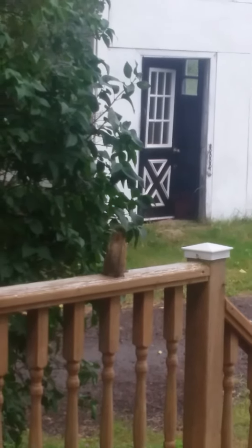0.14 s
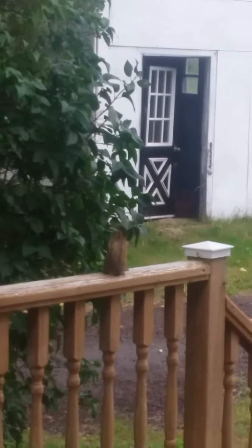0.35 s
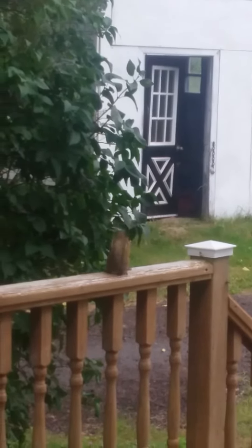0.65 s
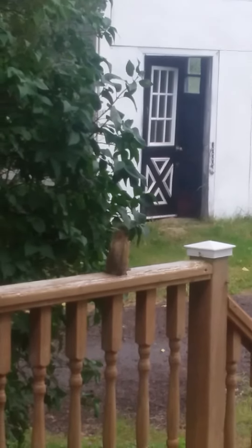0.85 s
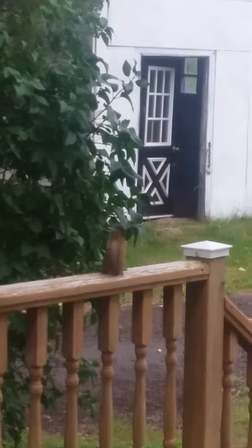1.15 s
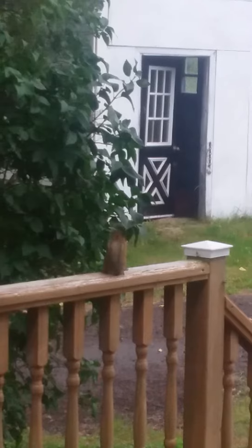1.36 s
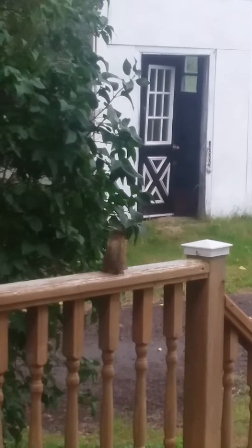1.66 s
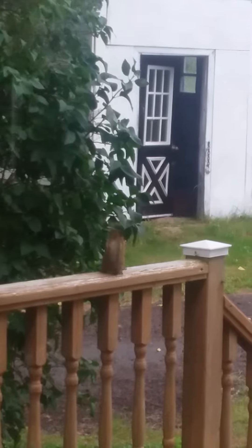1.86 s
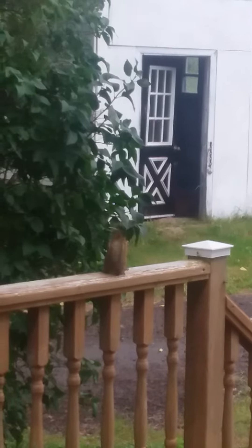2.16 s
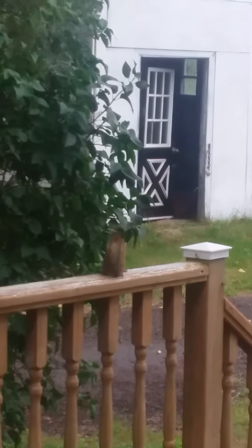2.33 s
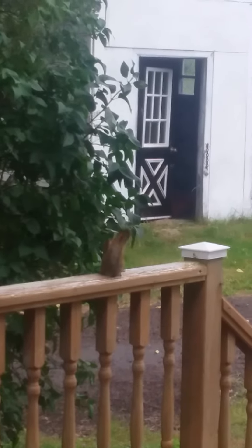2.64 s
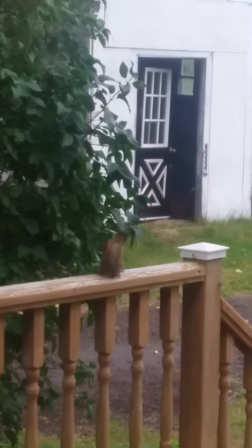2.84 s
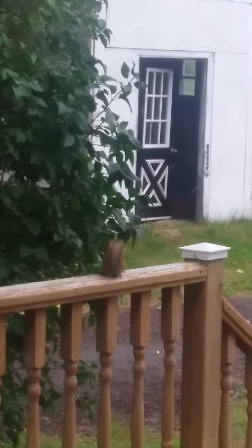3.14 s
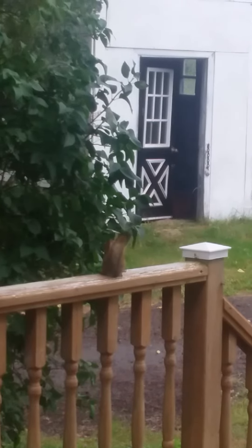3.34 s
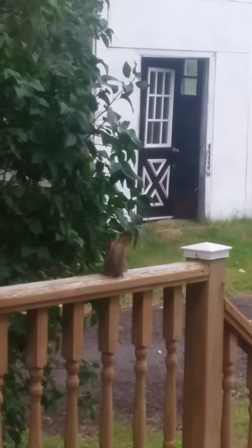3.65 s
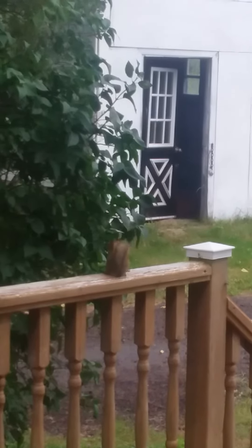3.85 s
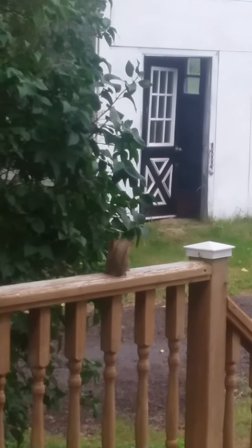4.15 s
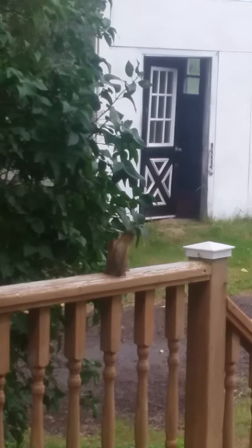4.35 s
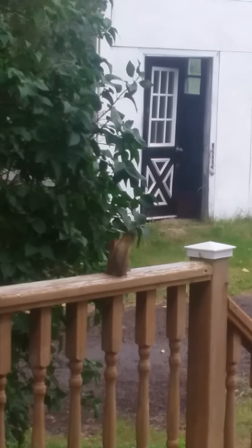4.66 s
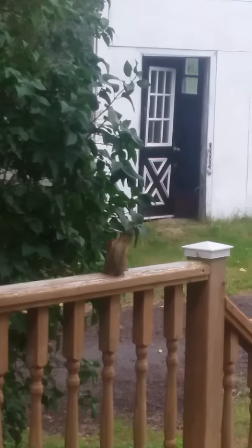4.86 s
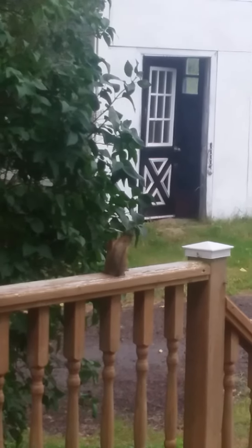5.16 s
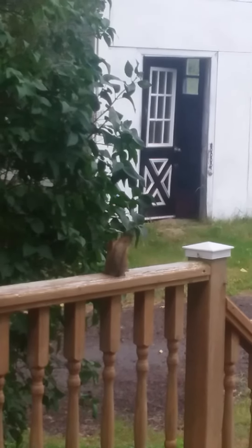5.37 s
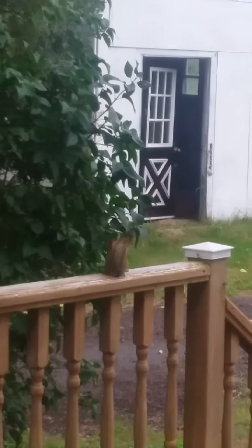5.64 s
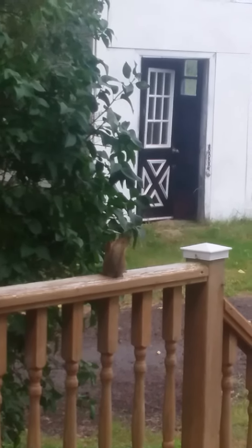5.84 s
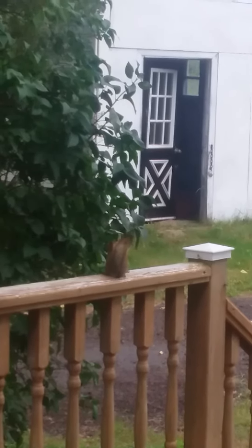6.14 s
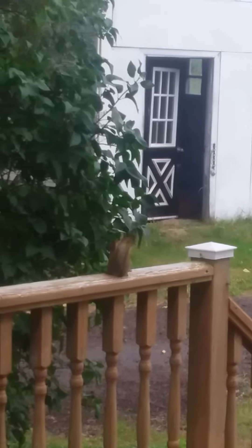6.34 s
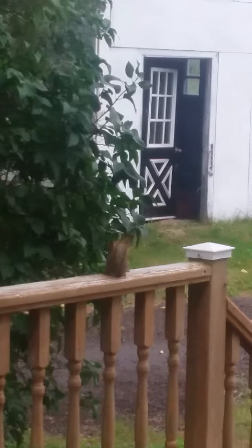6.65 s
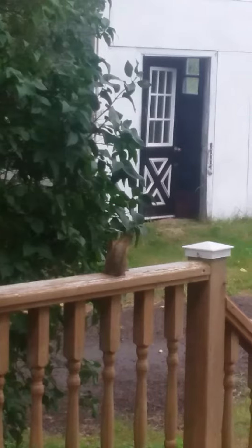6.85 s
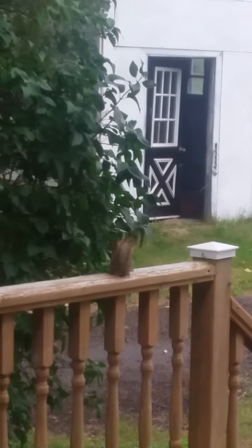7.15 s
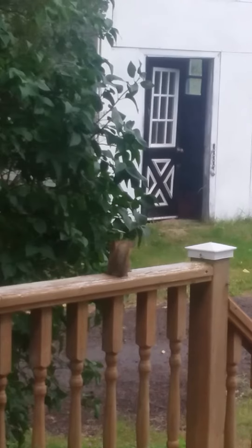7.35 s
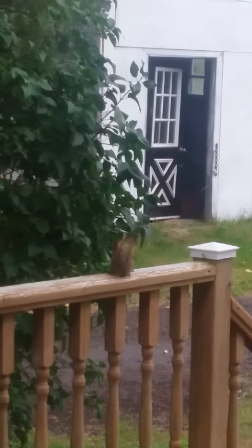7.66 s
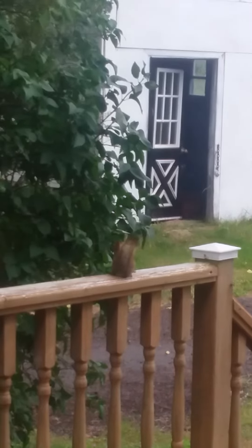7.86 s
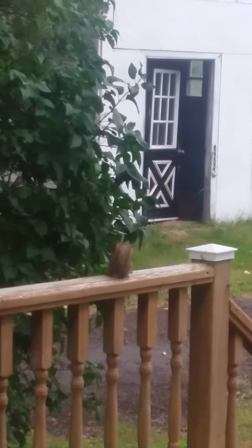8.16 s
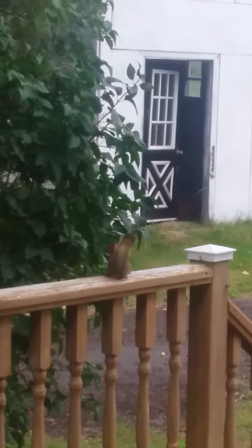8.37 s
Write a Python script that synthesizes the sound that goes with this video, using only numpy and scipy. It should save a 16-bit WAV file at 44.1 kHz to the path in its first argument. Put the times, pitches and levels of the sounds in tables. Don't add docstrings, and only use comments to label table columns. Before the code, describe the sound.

Brief piercing squirrel chirps repeat about three times a second outdoors, mixed with raspy huffs and claw knocks on wood over soft insects and hum.

```python
import sys
import numpy as np
from scipy import signal
from scipy.fft import rfft, irfft
from scipy.io import wavfile
from scipy.ndimage import uniform_filter1d

SR = 44100
rng = np.random.default_rng(int(sys.argv[2]) if len(sys.argv) > 2 else 0)


def int16_out(signal):
    q = np.round(np.clip(np.atleast_2d(signal).T, -1, 1) * 32767)
    wavfile.write(sys.argv[1], SR, q.astype(np.int16))


def makeup_ratio(level_db):
    decades = np.asarray(level_db, float) / 20
    return 10 ** decades


N = 374837

# (frequency [Hz], density [dB per Hz])
AIR_COLOUR = [(15, -45), (25, -30), (59, -6.5), (102, 0), (212, -12), (301, -13), (591, -20.5),
              (1740, -28.5), (3520, -27), (3920, -24.5), (5280, -4), (6050, -19.5), (6920, -15.5),
              (8360, -30), (16000, -32)]
# (frequency [Hz], width [Hz], level [dB])
HUM_BANDS = [(80.8, 23, -67), (238.3, 6.4, -79), (301, 11.7, -75), (453.7, 21, -84)]
# (time [s], level [dB])
INSECT_SWELL = [(0.0, -50), (0.25, -55), (1.25, -55.5), (2.9, -53), (3.8, -55.5), (5.3, -52.5),
                (6.15, -55.5), (7.3, -54), (8.07, -53.5), (8.5, -55)]
# (delay [ms], level [dB])
WALL_ECHOES = [(2.1, 0.5), (5.5, -6), (9.5, -5.5), (15.3, 2.5), (23.5, -4), (28.5, -6), (36, -6)]
# (frequency [Hz], t60 [s])
YARD_DECAY = [(300, 0.28), (1500, 0.21), (3500, 0.3), (6300, 0.36), (9000, 0.39), (13000, 0.25)]
# (time [s], level [dB], pitch [Hz], t60 [s])
BOARD_RINGS = [
    (.692, -26.5, 785, 0.042),
    (1.544, -34, 684, 0.065),
    (2.437, -43, 1296, 0.049),
    (3.023, -39, 687, 0.085),
    (3.084, -42.5, 760, 0.038),
    (3.354, -42, 820, 0.051),
    (3.889, -60, 930, 0.077),
    (4.061, -53.5, 1150, 0.18),
    (5.07, -50.5, 1070, 0.1),
]
# (time [s], level [dB], centre [Hz], width [Hz], t60 [s])
SCUFFS = [
    (2.822, -61, 1990, 3000, 0.46),
    (5.07, -61, 1500, 2480, 0.33),
    (5.49, -51, 1860, 1800, 0.33),
    (6.215, -64, 7800, 3500, 0.67),
    (6.629, -70, 2220, 3000, 0.37),
]
# (frequency [Hz], rise [ms], shake [ms], rattle t60 [s])
RAIL_PARTS = [
    (366, 4.8, 26, 0.48),
    (1010, 1.6, 9.3, 0.23),
    (3400, 0.42, 5.7, 0.14),
    (5670, 0.37, 6, 0.046),
    (10600, 0.066, 6.4, 0.3),
]
# (frequency [Hz], level [dB])
WOOD_COLOUR = [(300, 2), (520, -1), (780, 1), (1050, -4), (1400, -4), (2200, -8.5), (3050, -1.5),
               (3350, 4.5), (3800, 0), (4500, 5), (8500, 1.5), (10200, -15), (12500, 3), (15500, 8)]
# (time [s], peak [dB], thud [dB], knock [dB], claw tips [dB])
LANDINGS = [(0.253, -41, -5.5, -13, -16), (0.4773, -31, -23, -19.5, -14), (0.6878, -20, -15.5, -7.5, -12),
            (1.5416, -27.5, -17.5, -5.5, -4.5), (1.653, -35, -15, -16.5, -6), (2.3441, -26, -29, -18, -8.5),
            (2.4179, -37, -11, -24, -17), (2.431, -28.5, -10.5, -14.5, -12.5),
            (2.8213, -44.5, -22, -1.5, -7), (3.021, -19, -21.5, -11.5, -5.5), (3.0686, -40.5, -8, -9, -14),
            (3.0805, -37, -9, 4.5, -1), (3.3523, -28.5, -22.5, -15, -6), (3.61, -32, -28, -13, 4),
            (3.6574, -33.5, -32, -8, -4), (4.0597, -33, -18.5, -10, -8), (4.3992, -43, -28, -17, -33),
            (4.5425, -36.5, -41, -13.5, -7), (5.0683, -48.5, -7, -5.5, 11), (5.4915, -42.5, -5.5, -7, -29),
            (6.7246, -38.5, -11.5, -14, -11), (8.255, -50.5, -5, -4, -3)]
# (time [s], peak [dB], weight [dB], scratch [dB])
TICKS = [(0.16, -58, -5, 14), (0.8413, -63, 2, 5), (0.9477, -44.5, -22, -3), (1.0174, -45.5, -14, 1),
         (3.4044, -48.5, -6, 1), (3.47, -51.5, 2.5, 7.5), (3.8855, -47.5, -6, -11), (4.0006, -50, -7, 3),
         (4.9894, -67, -10, 6), (5.0004, -59, -5, 8), (6.2122, -52, -23, 2), (6.63, -53.5, -5, 7),
         (6.8344, -51, -12, 8), (7.1784, -50, -20, 6), (8.1454, -53, -32, 6), (8.2751, -46.5, -11, 6)]
# (time [s], level [dB])
GASPS = [
    (.085, -61),
    (.945, -60),
    (4.083, -58),
    (4.913, -58),
    (7.355, -59),
]
# (time [s], level [dB], end pitch [Hz], length [ms], glide [0-1])
SQUEAKS = [
    (0.6167, -40, 3750, 8.4, 0.32),
    (0.6163, -42, 6760, 12, 0.3),
    (2.857, -50, 8300, 15, .07),
]
# (time [s], level [dB], length [ms], voiced share [0-1], hiss [dB])
HUFFS = [
    (1.103, -33.5, 43.7, 0.68, -15),
    (1.480, -36, 40, 0.38, -2),
    (2.262, -37, 53, 0.44, -12.5),
    (2.915, -35.5, 44.9, 0.39, -1.5),
    (3.606, -35, 51, 0.28, -1),
    (4.464, -35, 43, 0.33, -0.5),
    (5.229, -35, 46, 0.31, -1),
    (5.961, -35, 47, 0.44, -1.5),
    (6.407, -34.5, 44.8, 0.38, -3),
    (7.626, -34, 50.4, 0.22, -1),
]
# (frequency [Hz], width [Hz], level [dB])
THROAT = [(1150, 150, -8), (1920, 720, -12), (2856, 470, -3.5), (3214, 550, 1), (3707, 254, 1.5),
          (4020, 1200, -7.5), (5300, 4600, -22.5), (6930, 2500, -10)]
# (frequency [Hz], width [Hz], level [dB])
NOSE = [(9700, 6400, -2), (12460, 2000, 6.5), (15300, 4500, -8)]
# (time [s], level [dB], top pitch [Hz], length [ms], strain: half-pitch tone [dB])
CHIRPS = [(0.025, -30.5, 6660, 40.4, -31), (0.3832, -29, 6720, 37, -27.5), (0.6235, -30, 5610, 12.5, -34),
          (0.8744, -28.5, 6720, 31, -27), (1.437, -30, 6710, 37.4, -30), (1.8588, -28.5, 6715, 46, -27),
          (2.1105, -30, 6730, 25.6, -20.5), (2.5468, -29.5, 6800, 39.4, -25),
          (2.8784, -28.5, 6740, 27.7, -17), (3.256, -29, 6720, 40, -24.5), (3.566, -28.5, 6730, 33.3, -21),
          (4.024, -27.5, 6790, 37, -20), (4.43, -28.5, 6750, 28.5, -22), (4.8574, -28, 6770, 34.4, -17.5),
          (5.1958, -27, 6620, 28, -23), (5.6025, -27.5, 6645, 36, -21.5), (5.9212, -28, 6720, 28.3, -25),
          (6.3645, -27, 6710, 32.6, -21.5), (6.7711, -27, 6710, 30.8, -23.5),
          (7.004, -28.1, 6756, 32.4, -21.5), (7.3078, -28, 6700, 32.4, -25),
          (7.5858, -28.5, 6700, 33.6, -27), (7.8866, -29, 6630, 30.5, -26), (8.148, -28.5, 6790, 35.5, -18)]
# (time [ms], share of top pitch [0-1])
ARCH_RISE = [(-3.5, 0.461), (-1, 0.54), (1, 0.9), (2, .88), (8, .975), (14.5, 1.001)]
# (time from the end [ms], share of top pitch [0-1])
ARCH_FALL = [(-13, 0.96), (-8, 0.93), (-2, .875), (0.5, 0.8), (4, 0.606)]
# (frequency [Hz], level [dB])
MOUTH = [(2800, -24), (3300, -14), (3800, -10), (4600, -16), (5600, 3), (6200, 1.5), (6800, 0)]
# (frequency [Hz], level [dB])
OCTAVE_MOUTH = [(9800, -11), (11200, -10), (12100, 0.5), (12900, -10), (13600, -17)]


def evened(x):
    return x / np.sqrt(np.mean(x ** 2) + 1e-20)


def read(points, hz):
    f, value = np.transpose(points)
    return np.interp(np.log(hz + 1), np.log(f + 1), value)


def add(mix, s, sound):
    part = mix[max(round(s * SR), 0):][:len(sound)]
    part += sound[:len(part)]


def resonate(x, hz, width):
    turn = np.exp(2j * np.pi * np.cumsum(hz * np.ones(len(x))) / SR)
    r = np.exp(-np.pi * width / SR)
    smooth = signal.lfilter([(1 - r) ** 2], [1, -2 * r, r * r], x / turn)
    return 2 * (turn * smooth).real


def wobble(count, samples):
    once = uniform_filter1d(rng.standard_normal(count), samples)
    return evened(uniform_filter1d(once, samples))


def air():
    frames, hz = N // 256 + 5, np.fft.rfftfreq(1024, 1 / SR)
    a, b, patches = rng.standard_normal((frames, 513, 3)).T
    patches = uniform_filter1d(patches, size=10, axis=0)
    patches = evened(uniform_filter1d(patches, size=16, axis=1))
    z = (a + 1j * b) * makeup_ratio(read(AIR_COLOUR, hz)[:, None] + 0.84 * patches)
    return makeup_ratio(-59.5) * evened(signal.istft(z, nperseg=1024, noverlap=768)[1][:N])


def hum():
    t = np.arange(N) / SR - 3.08
    mains = makeup_ratio(-65.5) * np.sin(2 * np.pi * 120 * t)
    motor = makeup_ratio(-73.3) * np.sin(2 * np.pi * 118.72 * t)
    bands = sum(makeup_ratio(db) * evened(resonate(rng.standard_normal(N), hz, width)) for hz, width, db in HUM_BANDS)
    return mains + motor + bands


def insects():
    clicks = (rng.random((8, N)) < 260 / SR) * makeup_ratio(1.03 * rng.standard_normal((8, N)))
    chorus = 0
    for click, hz in zip(clicks, np.linspace(4850, 5650, num=8)):
        chorus = chorus + resonate(click, hz, 490) * np.exp(-((hz - 5270) / 330) ** 2)
    swell_db = np.interp(np.arange(N) / SR, *np.transpose(INSECT_SWELL))
    return makeup_ratio(swell_db - 2.5) * evened(chorus)


def yard():
    taps = np.zeros(SR)
    at = np.arange(60, SR - 20, 20) + rng.integers(0, 20, (SR - 61) // 20)
    taps[at] = rng.choice([-1., 1.], len(at))
    hz, t, z = signal.stft(taps, SR, nperseg=128)
    near = makeup_ratio(-60 * t / read(YARD_DECAY, hz)[:, None])
    far_trees = makeup_ratio(-42 - 60 * t / 0.81)
    tail = signal.istft(z * (near + far_trees), SR, nperseg=128)[1]
    tail = makeup_ratio(4.5) * tail / np.linalg.norm(tail)
    for ms, db in WALL_ECHOES:
        scatter = rng.standard_normal(200) * np.exp(-np.arange(200) / 30)
        add(tail, ms / 1000, makeup_ratio(db - 3.0) * scatter / np.linalg.norm(scatter))
    return tail


def ring(db, hz, t60):
    t = np.arange(6000) / SR
    pair = np.sin(2 * np.pi * hz * t) + 0.46 * np.sin(2 * np.pi * 1.09 * hz * t)
    return makeup_ratio(db - 60 * t / t60) * np.minimum(t / 0.001, 1) * pair


def scuff(db, hz, width, t60):
    t = np.arange(8000) / SR
    slips = rng.standard_normal(8000) * (rng.random(8000) < .06) * makeup_ratio(1.6 * wobble(8000, samples=60))
    fade = np.exp(-(t / 0.015) ** 4) + 0.63 * makeup_ratio(-60 * t / t60)
    return makeup_ratio(db) * evened(resonate(slips, hz, width)) * fade


def claw(db, thud_db, knock_db, edge_db, sharp_db):
    ms, hz = np.arange(6000) * 1000 / SR, np.fft.rfftfreq(6000, 1 / SR)
    chance, (size, rattle) = rng.random(6000), rng.standard_normal((2, 6000))
    wood = makeup_ratio(read(WOOD_COLOUR, hz * rng.uniform(0.77, 1.05)))
    rattle = rattle * makeup_ratio(4.9 * wobble(6000, samples=70))
    first_blow = 5.9 * (np.arange(6000) == 6)
    blows = size * (chance < .3) / np.sqrt(.3) + first_blow
    centres = [120] + [part[0] for part in RAIL_PARTS] + [19000]
    out = 0
    for k, level_db in enumerate((thud_db, knock_db, 0, edge_db, sharp_db)):
        _, rise_ms, shake_ms, t60 = RAIL_PARTS[k]
        band = read(list(zip(centres, np.eye(len(centres))[k + 1])), hz)
        crackle, loose = irfft(rfft([blows, rattle]) * band * wood)
        crackle = crackle * np.minimum(ms / rise_ms, 1) * np.exp(-(ms / shake_ms) ** 1.7)
        loose = loose * np.minimum(ms / 2.0, 1) * makeup_ratio(-18.0 - 60 * ms / 1000 / t60)
        out = out + makeup_ratio(db + level_db - 0.5) * (crackle + loose) / np.abs(crackle).max()
    return out


def tick(db, weight_db, scratch_db):
    return claw(db, -8 + 0.28 * weight_db, weight_db, scratch_db, scratch_db - 9.5)


def landing(db, thud_db, knock_db, tips_db):
    return claw(db, thud_db, knock_db, 2 + 0.52 * tips_db, tips_db)


def squeak(db, pitch_hz, length_ms, glide):
    u = np.linspace(0, 1, round(length_ms * SR / 1000))
    unsteady = 0.0086 * (pitch_hz - 3000) / 1000
    hz = pitch_hz * (1 - glide * (1 - u) ** 1.46 + unsteady * wobble(2000, samples=25)[:len(u)])
    return makeup_ratio(db) * np.sin(2 * np.pi * np.cumsum(hz) / SR) * np.sin(np.pi * u)


def gasp(db):
    return squeak(db, pitch_hz=14100, length_ms=23, glide=.09)


def huff(db, length_ms, voiced, hiss_db):
    u = np.linspace(0, 1, round(length_ms * SR / 1000))
    noise, hiss = rng.standard_normal((2, 6000))[:, :len(u)]
    jitter = .025 * wobble(6000, samples=60)[:len(u)]
    slack_hz, tense_hz = 865, 935
    fold_hz = slack_hz + (tense_hz - slack_hz) * voiced
    turns = np.cumsum(fold_hz * (1 - .3 * np.exp(-u / .17) + jitter)) / SR
    folds = sum(np.cos(2 * np.pi * k * turns) for k in range(3, 10))
    voiced = np.clip(voiced, 0, 1)
    breath = noise * (0.8 + np.exp(-(turns % 1) / 0.5))
    drive = voiced * evened(folds) + (1 - voiced) * evened(breath)
    opening_hz = 150 * (u - .55)
    throat = 0
    for k, (hz, width, level_db) in enumerate(THROAT):
        throat = throat + (-1) ** k * makeup_ratio(level_db) * resonate(drive, hz + opening_hz, width)
    chest = makeup_ratio(-15) * np.sin(2 * np.pi * turns)
    chest = chest + makeup_ratio(-16.5) * (1.1 - u) * np.sin(4 * np.pi * turns)
    nose = sum(makeup_ratio(level_db) * resonate(hiss, hz, width) for hz, width, level_db in NOSE)
    effort = np.interp(u, [0, .12, .45, .8, 1], [0.082, 0.2, 0.54, 0.13, 0.05])
    effort = effort * makeup_ratio(3.9 * wobble(6000, samples=90)[:len(u)])
    return makeup_ratio(db) * effort * (evened(throat) + chest + makeup_ratio(hiss_db) * evened(nose))


def chirp(db, top_hz, length_ms, half_db):
    haste = min(length_ms / 28, 1)
    rise = [(ms * haste, share) for ms, share in ARCH_RISE]
    fall = [(length_ms + ms * haste, share) for ms, share in ARCH_FALL]
    arch = np.array(rise + fall)
    ms = np.arange(arch[0, 0], arch[-1, 0], 1000 / SR)
    wander = wobble(4000, samples=60)[:len(ms)]
    flutter = wobble(4000, samples=30)[:len(ms)]
    glide = uniform_filter1d(np.interp(ms, *arch.T), size=24, mode="nearest")
    hz = top_hz * glide * (1 + 0.0031 * wander)
    phase = 2 * np.pi * np.cumsum(hz) / SR
    whistle = makeup_ratio(read(MOUTH, hz)) * np.sin(phase)
    octave_db = -14.5 + 0.23 * half_db + read(OCTAVE_MOUTH, 2 * hz)
    octave = makeup_ratio(octave_db) * np.sin(2 * phase + 0.37 * flutter)
    half = np.sin(phase * .525 - 2 * np.pi * .0045 * ms ** 2 + 0.19 * flutter)
    half = half * 1.04 * np.exp(-((ms / length_ms - .45) / 0.17) ** 2)
    between = half + 0.11 * np.sin(phase * 3 / 2) + 0.13 * np.sin(phase * 1.27 + 1.5 * flutter)
    held = np.clip((hz / top_hz - .9) / 0.11, 0, 1)
    tone = whistle + octave + makeup_ratio(half_db + 4.5) * held * between
    effort = np.interp(ms / length_ms, [0, .08, .2, .5, .72, 1.0], [0.78, 0.69, 0.3, 0.95, 1.24, 0.68])
    return makeup_ratio(db - 2.0) * tone * effort * signal.windows.tukey(len(ms), .06)


def scene():
    voice, feet = np.zeros((2, N))
    for table, source in ((BOARD_RINGS, ring), (SCUFFS, scuff), (TICKS, tick), (LANDINGS, landing)):
        for s, *row in table:
            add(feet, s, source(*row))
    for table, source in ((GASPS, gasp), (SQUEAKS, squeak), (HUFFS, huff)):
        for s, *row in table:
            add(voice, s, source(*row))
    for s, *row in CHIRPS:
        add(voice, s + ARCH_RISE[0][0] / 1000, chirp(*row))
    wet = signal.fftconvolve(makeup_ratio(-5) * voice + makeup_ratio(-18.5) * feet, yard())[:N]
    return (makeup_ratio(0.5) * voice + feet + wet + air() + insects() + hum())[None]


def band_limit(x):
    return signal.sosfilt(signal.butter(12, 16660, fs=SR, output="sos"), x)


def record(dry):
    thin = signal.sosfilt(signal.butter(3, 48, "high", fs=SR, output="sos"), dry)
    limited = signal.oaconvolve(thin, signal.firwin(255, 15900, fs=SR)[None], "same")
    return band_limit(limited)


dry = scene()
out = record(dry)
int16_out(out)
```